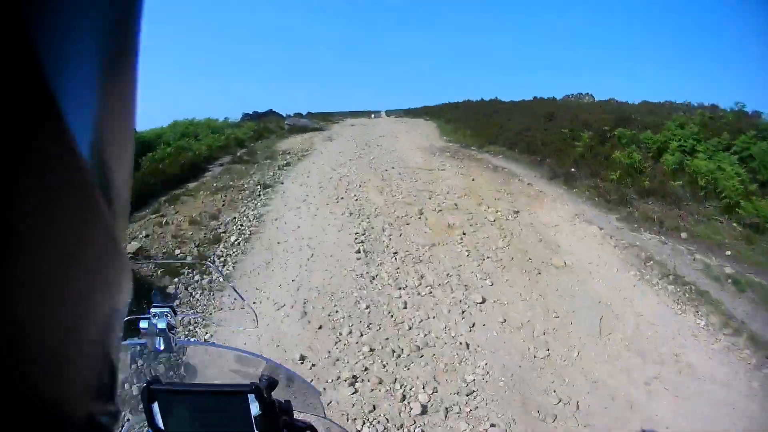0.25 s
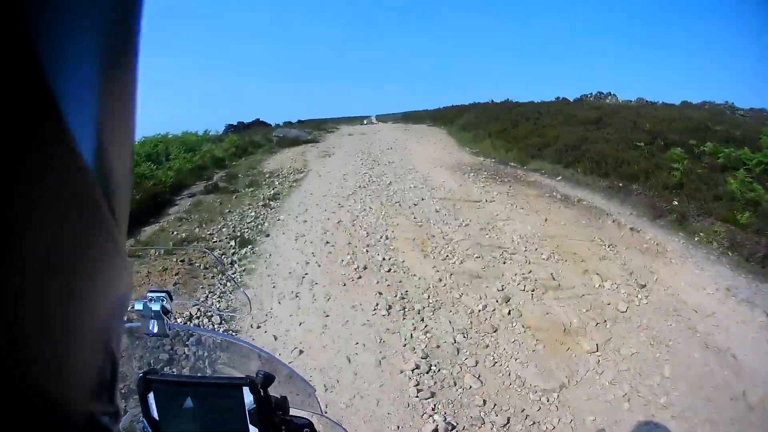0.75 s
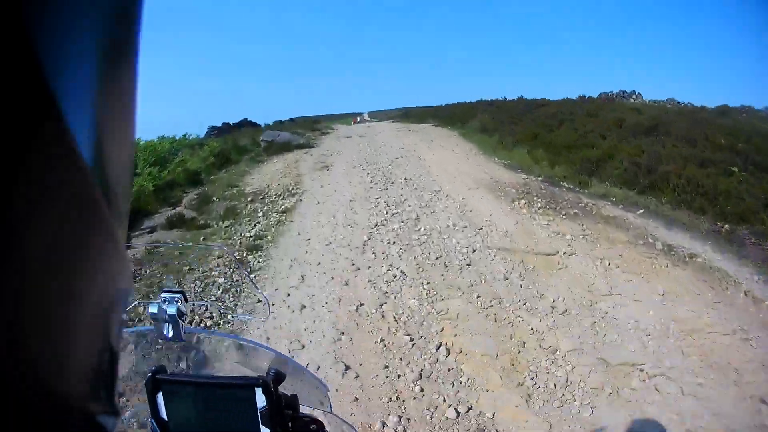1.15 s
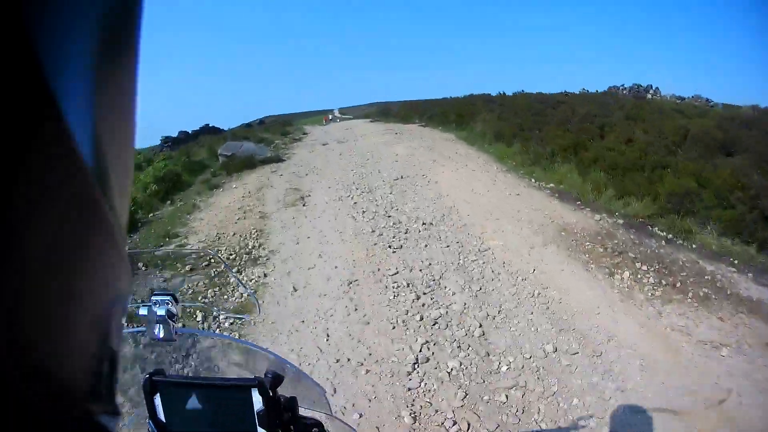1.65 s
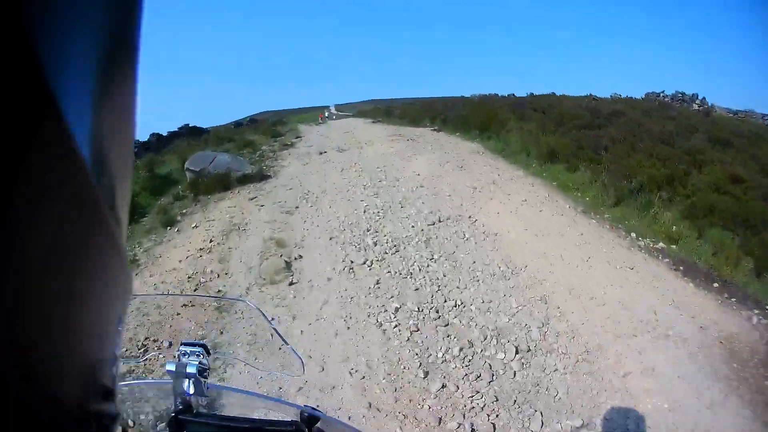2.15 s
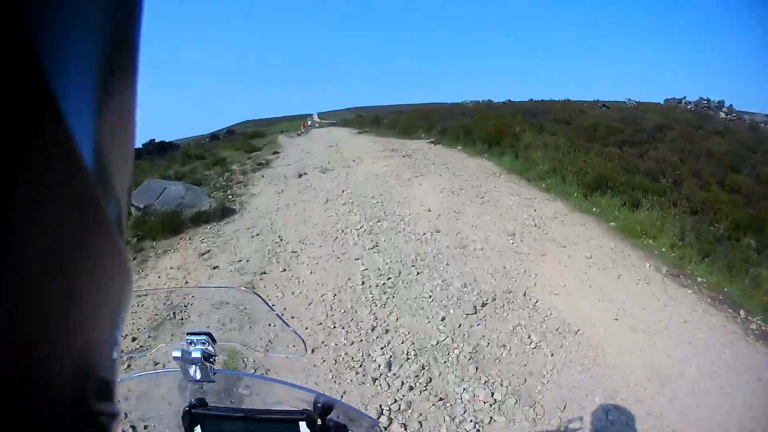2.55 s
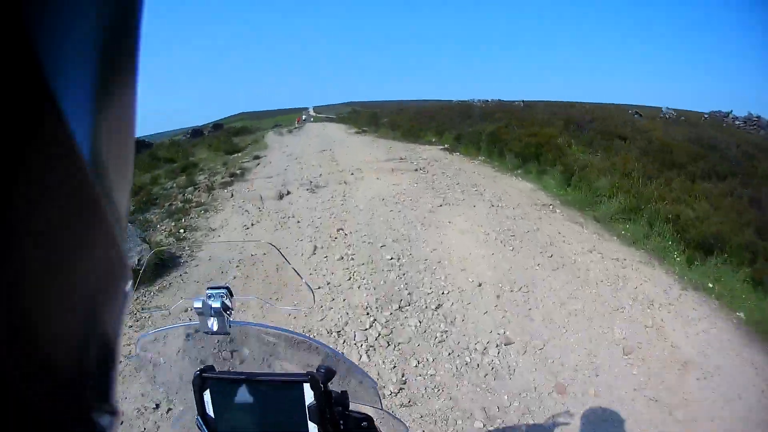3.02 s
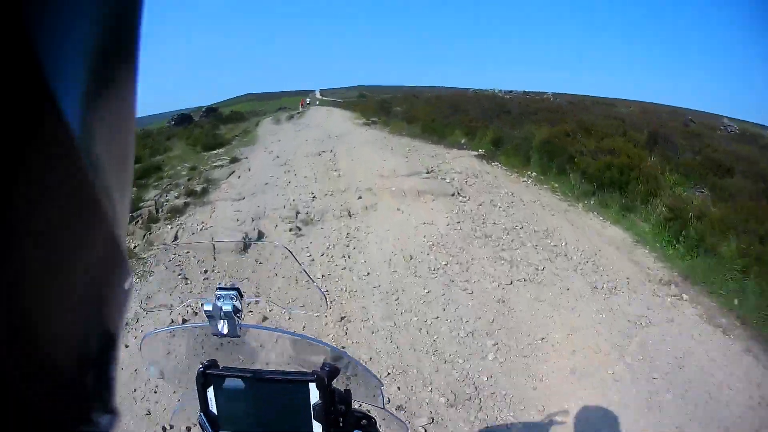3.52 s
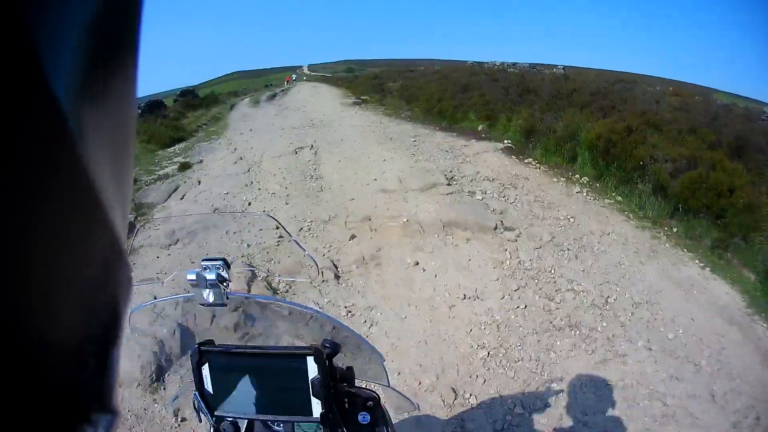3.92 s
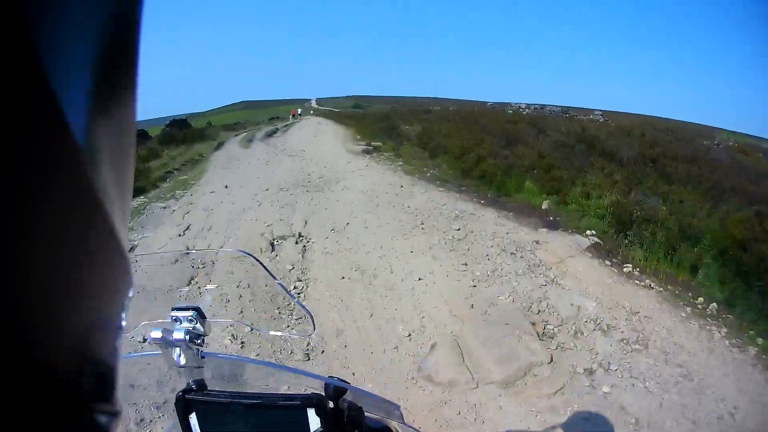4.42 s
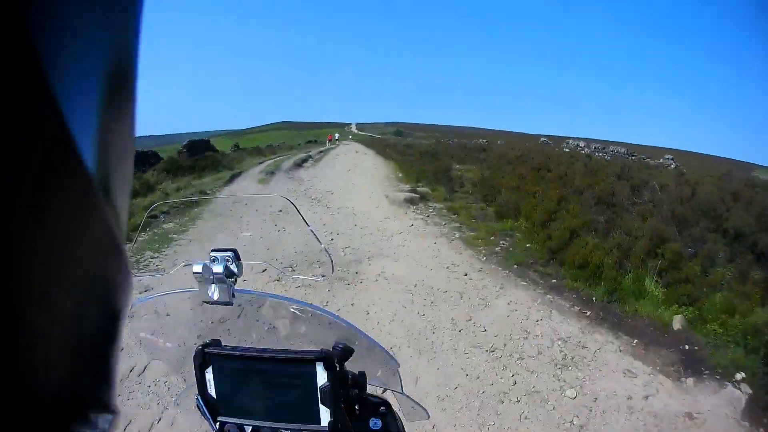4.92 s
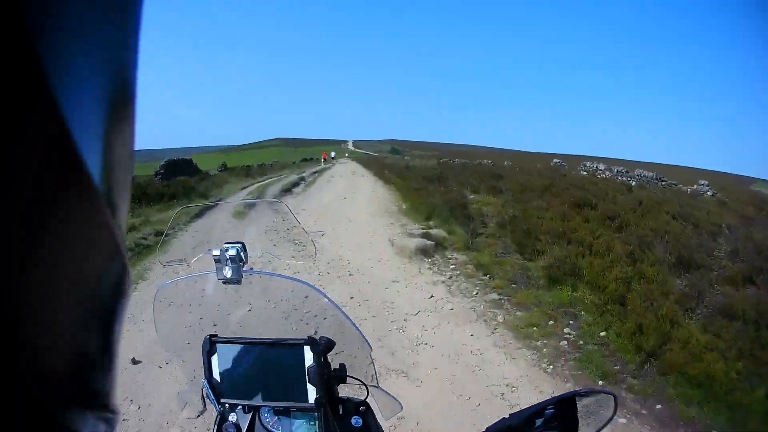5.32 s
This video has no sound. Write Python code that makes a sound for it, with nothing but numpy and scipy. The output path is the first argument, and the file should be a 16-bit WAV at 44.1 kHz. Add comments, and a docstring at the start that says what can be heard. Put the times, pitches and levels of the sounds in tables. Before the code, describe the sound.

Low, lumpy motorcycle engine beats over crunching gravel, with irregular dull thuds, sharp case rattles and ticking pebbles, under a thin treble hiss.

```python
"""A twin-cylinder motorcycle pulls along a stony track, heard by a small camera in a case on the rider's helmet.
Two uneven exhaust beats a cycle excite the decaying modes of the pipe; metal noise flares with each beat.
Gravel crunches as filtered random grains, and ruts knock the bike with thuds and resonant case rattles.
Pebbles tick, a small metal part pings, and the frame shakes over a low rumble.
The case dulls the knocks' upper modes; preamplifier hiss rises towards the treble."""
import sys
import numpy as np
from scipy import signal
from scipy.io import wavfile
from scipy.ndimage import uniform_filter1d

SR = 44100
rng = np.random.default_rng(int(sys.argv[2]) if len(sys.argv) > 2 else 0)


def store_wav(level_fs):
    """Save 16-bit WAV to argv[1]."""
    pcm = np.round(np.clip(np.atleast_2d(level_fs), -1, 1) * 32767)
    wavfile.write(sys.argv[1], SR, pcm.T.astype(np.int16))


def nominal_scale(level):
    """Amplitude ratio for a level in decibels (scalar or array-like)."""
    x = np.asarray(level, float) / 20
    return 10 ** x


N = 245637

# Crank speed. Each row: time in seconds, speed in rpm.
CRANK_SPEED = [(0.0, 2240.0), (0.39, 2168.4), (0.46, 2141.6), (0.51, 2325.9), (0.57, 2061.3),
               (0.96, 2122.8), (1.41, 2069.8), (1.46, 2124.5), (1.91, 1914.4), (1.97, 1998.3),
               (2.19, 1886.0), (3.11, 1989.0), (3.3, 2065.0), (3.64, 1983.3), (3.99, 2003.9),
               (4.05, 1816.6), (4.51, 1966.0), (4.56, 1791.4), (4.64, 1961.9), (5.07, 2050.8),
               (5.22, 1807.8), (5.57, 2045.3)]
# Engine load, heard as exhaust loudness. Each row: time in seconds, level in dB.
ENGINE_LOAD = [(0.0, -30.5), (0.09, -28.5), (1.72, -30), (1.83, -31.5), (2.22, -30.5), (2.25, -32),
               (2.96, -30), (4.56, -31), (4.9, -28.5), (4.96, -29.5), (5.57, -29)]
# Feeble firings. Each row: time in seconds, change of strength in dB.
FEEBLE_FIRINGS = [(0.003, -2.5), (2.25, -10), (4.14, -5), (4.268, -8), (4.332, -5)]
# Modes of the exhaust pipe. Each row: frequency in Hz, 60 dB decay time in seconds,
# signed share from the first cylinder, signed share from the second.
EXHAUST_MODES = [(59, 0.059, -0.25, -0.43), (85.4, 0.034, 0.28, 0.91), (104.7, 0.061, 0.071, -0.17),
                 (224.7, 0.053, 0.23, 0.23), (261.2, 0.18, 0.048, 0.029), (282.6, 0.059, -0.04, -0.17),
                 (327.5, 0.12, 0.034, 0.0023), (480, 0.019, 0.047, 0.03)]
# How loose the track lies. Each row: time in seconds, gravel crunch level in dB.
TRACK_LOOSENESS = [(0.0, -38.5), (0.54, -39.5), (0.73, -42), (1.58, -41), (2.0, -41.5), (2.25, -45.5),
                   (3.15, -41.5), (3.85, -44.5), (4.08, -41.5), (4.56, -40.5), (4.92, -37), (5.24, -42),
                   (5.57, -39.5)]
# Spectrum of the clattering metal. Each row: frequency in Hz, relative density in dB per Hz.
CLATTER_SPECTRUM = [(250, 8), (380, -15.5), (520, -19.5), (700, -30.5), (900, -8), (1150, -31.5),
                    (1700, -11), (2400, -16), (3000, -19.5), (3800, -32), (4400, -47), (8000, -37)]
# Filter that colours the crunching stones. Each row: frequency in Hz, gain in dB.
CRUNCH_SPECTRUM = [(200, -16), (330, -0.5), (550, -4.5), (750, -6.5), (1150, -10.5), (1600, -8.5),
                   (2400, -8), (3100, -15.5), (3800, -17.5), (4400, -29.5), (5600, -27.5), (10000, -44.5)]
# Spectrum of the preamplifier hiss. Each row: frequency in Hz, relative density in dB per Hz.
HISS_SPECTRUM = [(3000, 1), (4600, -2), (7000, -1), (10200, 1.5), (15300, 2.5)]
# Jolts from the ruts. Each row: start in seconds, thud peak in dB (before its boom),
# low clack peak in dB, bright crack peak in dB.
RUT_KNOCKS = [(0.0062, -25.5, -31, -30), (0.0162, -32, -41, -31.5), (0.085, -34, -44, -27),
              (0.1447, -24, -30, -32), (0.1575, -18, -25, -22), (0.163, -20, -38, -34),
              (0.1708, -24, -35, -40), (0.2013, -37, -40, -31), (0.2479, -22.5, -36, -27),
              (0.3493, -24.5, -35, -40), (0.36, -32, -34, -26), (0.3705, -22.5, -31, -26.5),
              (0.3856, -44, -37, -46), (0.4773, -23.5, -27, -38), (0.4901, -22, -29, -27),
              (0.562, -21, -32, -43), (1.242, -25.5, -35, -61), (1.371, -29, -29, -33),
              (1.4822, -21.5, -25, -26), (1.5047, -12, -20.5, -16.5), (1.5137, -17.5, -44, -31),
              (1.7119, -19, -22, -18.5), (1.7231, -23, -35, -29), (1.9156, -19.5, -26, -28),
              (1.9331, -25, -29.5, -23.5), (1.9462, -33, -36, -31), (1.9826, -25.5, -33, -35),
              (2.0083, -24.5, -29, -32), (2.018, -29, -31, -32), (2.029, -25, -29.5, -25.5),
              (2.043, -28, -48, -43), (3.3446, -22.5, -34, -42), (4.0379, -33, -52, -30),
              (4.09, -20, -29, -28), (4.1155, -13, -25, -16.5), (4.1262, -10.5, -26, -21),
              (4.221, -22.5, -40, -48), (4.2635, -21, -33, -34.5), (4.285, -15, -23.5, -20),
              (4.2942, -17.5, -34, -28), (4.308, -25.5, -40, -42), (4.318, -41, -44, -43),
              (4.3391, -21.5, -27, -27), (4.6339, -28, -30, -28), (4.646, -38, -35, -45),
              (4.7188, -23.5, -47, -48), (4.8465, -19, -39, -29), (4.859, -10.5, -21.5, -15.5),
              (4.8663, -11.5, -34, -27.5), (4.879, -26, -39, -52), (4.9237, -33, -33, -29.5),
              (5.4283, -27.5, -26, -29), (5.5066, -14.5, -31, -50), (5.5168, -19, -22.5, -43)]
# Modes that a knock rings, from low to high. Each row: central frequency in Hz,
# width in Hz (a second pass is twice as wide), relative level in dB.
CASE_MODES = [(806, 570, -1.5), (1060, 215, 2.5), (1384, 216, 5.5), (1900, 660, 12), (2260, 330, 11.5),
              (2650, 440, 12), (3220, 510, 4), (3620, 130, -33), (5270, 690, -27), (5550, 380, -31),
              (8150, 6800, -13)]
# Pings of a small metal part. Each row: start in seconds, level in dB before rise and decay.
METAL_PINGS = [(0.1476, -49), (0.5731, -44), (1.034, -45), (1.505, -38), (1.947, -43), (2.5496, -45),
               (2.809, -46), (3.2001, -50), (4.9237, -38)]
# Pebbles thrown against the bike. Each row: start in seconds, level in dB before rise and decay,
# pitch in Hz.
THROWN_PEBBLES = [(0.246, -34, 3840), (0.9487, -43, 3570), (1.1204, -39, 2300), (1.137, -36, 1780),
                  (1.1927, -36.5, 3380), (1.2114, -33, 2650), (1.426, -36, 3500), (1.431, -31, 2350),
                  (1.808, -34.5, 3500), (1.811, -33, 1760), (1.9832, -35, 2700), (2.429, -31.5, 1980),
                  (2.664, -38, 2250), (3.0335, -34, 2100), (3.4481, -44, 2160), (4.3705, -29, 2200),
                  (4.4179, -35.5, 3400), (4.4503, -29, 2210), (4.4952, -36, 2600), (5.2537, -32, 2500),
                  (5.2957, -42, 2040), (5.321, -34, 2250), (5.358, -32, 2000), (5.381, -30.5, 2380)]


def evened(x):
    """Normalisation by mean power: scales to rms 1."""
    return x / np.sqrt(np.mean(x ** 2) + 1e-20)


def curve(rows):
    """Linear interpolation: one value per sample from (seconds, value) rows."""
    rows = np.array(rows)
    return np.interp(np.arange(N) / SR, rows[:, 0], rows[:, 1])


def colour(x, points):
    """Minimum-phase filtering: the log gain of (Hz, dB) points fixes the phase of a causal filter."""
    hz = np.abs(np.fft.fftfreq(8192, 1 / SR))
    f, db = np.transpose(points)
    log_gain = np.log(nominal_scale(np.interp(np.log(hz + 1), np.log(f), db)))
    log_gain += 2 * np.log(np.clip(hz / f[0], 1e-3, 1))  # 12 dB an octave down below the first point
    taps = np.fft.ifft(np.exp(np.conj(signal.hilbert(log_gain)))).real[:4096]
    return signal.oaconvolve(x, taps)[:len(x)]


def resonate(x, hz, width):
    """Simple resonance: one damped complex pole, with a gain of about 1 at its peak."""
    pole = np.exp((2j * np.pi * hz - np.pi * width) / SR)
    return 2 * signal.lfilter([1 - abs(pole)], [1, -pole], x).real


def add(mix, s, sound):
    """Superposition: mixes a sound in at s seconds."""
    part = mix[max(round(s * SR), 0):][:len(sound)]
    part += sound[:len(part)]


def firings(first=.6553, second_lag=.3667, spread_db=.75):
    """Four-stroke timing: each cylinder fires once in two crank turns, with slightly uneven strength."""
    # first and second_lag are fractions of the four-stroke cycle
    cycles = np.cumsum(curve(CRANK_SPEED)) / SR / 120 - first
    trains = np.zeros((2, N))
    chance = rng.standard_normal((2, 200))
    for k in range(2):
        at = np.flatnonzero(np.diff(np.floor(cycles - k * second_lag)))
        db = spread_db * chance[k, :len(at)]
        for s, feeble_db in FEEBLE_FIRINGS:
            db = db + feeble_db * (abs(at / SR - s) < .008)
        trains[k, at] = nominal_scale(db)
    return trains


def exhaust(trains, echo_s=0.01512, echo=0.1):
    """Impulse excitation of pipe modes: a short suction, a sharp puff and its one return from the open end."""
    lead = SR // 50
    t = np.arange(-lead, 2 * lead) / SR
    suction = -.83 * np.exp(-abs(t) / .0019)
    pulse = np.where(t < 0, suction, np.exp(-abs(t) / .001))
    returned = echo * (t >= echo_s) * np.exp(-abs(t - echo_s) / 0.00049)
    u = np.arange(SR // 3) / SR
    echo_ring = nominal_scale(-60 * u / 0.056) * np.sin(2 * np.pi * 285 * u)
    out = np.zeros(N)
    for k, train in enumerate(trains):
        rings = np.zeros(len(u))
        for hz, t60, *shares in EXHAUST_MODES:
            rings += shares[k] * nominal_scale(-60 * u / t60) * np.sin(2 * np.pi * hz * u)
        beat = signal.fftconvolve(pulse, rings) + signal.fftconvolve(returned, echo_ring)
        out += signal.oaconvolve(train, beat)[lead:lead + N]
    return nominal_scale(curve(ENGINE_LOAD)) * evened(out)


def clatter(trains, level_db=-41.5, steady=.13, second=.75, valve=.4):
    """Amplitude modulation of noise: metal flares after each firing and again when a valve seats."""
    t = np.arange(SR // 25) / SR
    flare = (1 - np.exp(-t / 0.0012)) * np.exp(-t / 0.004)
    seating = np.roll(trains.sum(0), round(0.0131 * SR))  # 13.1 ms after the firing
    beats = trains[0] + second * trains[1] + valve * seating
    gate = steady + signal.oaconvolve(beats, flare / flare.max())[:N]
    wobble = nominal_scale(0.97 * evened(uniform_filter1d(rng.standard_normal(N), 150)))
    noise = gate * wobble * rng.standard_normal(N)
    return nominal_scale(level_db) * evened(colour(noise, CLATTER_SPECTRUM))


def tumbling(under_crack_db=-23, t60=0.17):
    """Exponential decay: stones keep tumbling after each knock, starting this far under its crack."""
    jolts = np.zeros(N)
    t = np.arange(SR // 4) / SR
    for s, _, _, crack_db in RUT_KNOCKS:
        add(jolts, s, nominal_scale(crack_db + under_crack_db - 60 * t / t60))
    return jolts


def gravel(per_s=600, size_db=4.0, large_db=2.5, large_boost_db=6, grain_s=0.003, rise_s=0.0004):
    """Random shot noise: stones of uneven size crack under the tyres, large ones low and small ones high."""
    draw = rng.random((3, N))
    size = np.minimum(rng.exponential(1, (3, N)), 4)
    stones = (draw < per_s / SR) * nominal_scale(np.array([[large_db], [size_db], [size_db]]) * size)
    stones = signal.lfilter([1], [1, -np.exp(-1 / (rise_s * SR))], stones)
    envelopes = signal.lfilter([1], [1, -np.exp(-1 / (grain_s * SR))], stones)
    bursts = envelopes * rng.standard_normal((3, N))
    bands = [(1100, "low"), ((1100, 2300), "band"), (2300, "high")]
    large, middle, small = (signal.lfilter(*signal.butter(2, hz, kind, fs=SR), burst)
                            for (hz, kind), burst in zip(bands, bursts))
    crunch = colour(nominal_scale(large_boost_db) * large + middle + small, CRUNCH_SPECTRUM)
    return (nominal_scale(curve(TRACK_LOOSENESS)) + tumbling()) * evened(crunch)


def knocks(rattle_db=-14.0, rattle_t60=0.085, bounce_db=6.0, boom_db=-8, mode_spread_db=2.5,
           thud_base_hz=406, thud_spread=0.085, hollow_from_db=9.5, hollow_hz_per_db=16.5):
    """Modal excitation: a blow and bouncing rattle ring the case, over a dull thud that starts inward."""
    out = np.zeros(N)
    t = np.arange(SR // 8) / SR
    case_wall = signal.butter(4, 4300, fs=SR, output="sos")
    noise = rng.standard_normal((len(RUT_KNOCKS), 2, len(t)))
    spots = rng.standard_normal((len(RUT_KNOCKS), 1 + len(CASE_MODES)))
    for (s, thud_db, clack_db, crack_db), (n, lumps), spot in zip(RUT_KNOCKS, noise, spots):
        # each knock lands elsewhere, so pitch and modes vary
        thud_hz = thud_base_hz * np.exp(thud_spread * spot[0])
        shares = nominal_scale(mode_spread_db * spot[1:])
        # a crack far under the thud makes a higher, hollow knock
        thud_hz += hollow_hz_per_db * max(thud_db - crack_db - hollow_from_db, 0)

        blow = 1.3 * n * np.minimum(t / 0.0004, 1) * np.exp(-t / 0.0011)
        bounces = nominal_scale(bounce_db * evened(uniform_filter1d(lumps, size=50)))
        rattle = n * bounces * np.minimum(t / 0.0027, 1) * nominal_scale(rattle_db - 60 * t / rattle_t60)
        # the modes above 4.5 kHz get only a brief hiss of light parts
        light = n * np.minimum(t / 0.001, 1) * nominal_scale(-17 - 60 * t / 0.045)
        rings = []
        for (hz, width, db), share in zip(CASE_MODES, shares):
            source = rattle + blow if hz < 4500 else light
            mode_hz = hz * share ** .1
            ring = resonate(resonate(source, mode_hz, width), mode_hz, 2 * width)
            rings.append(share * nominal_scale(db) * ring)
        clack = sum(rings[:3])
        crack = signal.sosfilt(case_wall, sum(rings[3:8])) + sum(rings[8:])

        # the thud swells within a turn and dies in a few
        thud = -np.sin(2 * np.pi * thud_hz * t) * np.minimum(t * thud_hz * 1.3, 1)
        thud *= nominal_scale(-60 * t * thud_hz / 3.6)
        boom = evened(resonate(resonate(n, 180, 260), 190, 320))
        boom *= np.minimum(t / 0.005, 1) * nominal_scale(boom_db - 60 * t / rattle_t60)
        add(out, s, nominal_scale(crack_db) * crack / abs(crack).max())
        add(out, s, nominal_scale(clack_db) * clack / abs(clack).max())
        add(out, s, nominal_scale(thud_db) * (thud / abs(thud).max() + boom))
    return out


def pebbles(t60=0.022, rise_s=.0008, grit=0.6):
    """Damped impact tone with narrow-band noise: each pebble ticks grittily at its own pitch."""
    out = np.zeros(N)
    t = np.arange(SR // 20) / SR
    noise = rng.standard_normal((len(THROWN_PEBBLES), len(t)))
    for (s, db, hz), n in zip(THROWN_PEBBLES, noise):
        rough = evened(resonate(resonate(n, hz, 900), hz, 840))
        tick = np.sin(2 * np.pi * hz * t) + grit * rough
        add(out, s, nominal_scale(db - 60 * t / t60) * np.minimum(t / rise_s, 1) * tick)
    return out


def pings(hz=5580, t60=0.024, rise_s=0.0023):
    """Free vibration with damping: a small metal part gives a brief high ring."""
    out = np.zeros(N)
    t = np.arange(SR // 20) / SR
    for s, db in METAL_PINGS:
        add(out, s, nominal_scale(db - 60 * t / t60) * np.minimum(t / rise_s, 1) * np.sin(2 * np.pi * hz * t))
    return out


def shake(shake_db=-50, lag_turns=0.35, rumble_db=-52, bump_s=2.19, bump_db=-32):
    """Forced vibration: the frame shakes once a crank turn, over lumpy track rumble and one soft bump."""
    turns = np.cumsum(curve(CRANK_SPEED)) / SR / 60
    frame = nominal_scale(shake_db) * np.sqrt(2) * np.sin(2 * np.pi * (turns - lag_turns))
    rumble = evened(resonate(resonate(rng.standard_normal(N), 36, 30), 39, 40))
    since = np.arange(N) / SR - bump_s
    bump = nominal_scale(bump_db) * np.exp(-(since / 0.062) ** 2) * np.sin(2 * np.pi * 40 * since)
    return frame + nominal_scale(rumble_db) * rumble + bump


def scene():
    """Linear superposition of engine, tyres, jolts and shaking; one set of firings drives the engine sounds."""
    trains = firings()
    engine = exhaust(trains) + clatter(trains)
    track = gravel() + knocks() + pebbles()
    return (engine + track + pings() + shake())[None]


def low_pass(x):
    """Removes everything above the highest recorded frequency."""
    return signal.sosfilt(signal.butter(12, 16290, fs=SR, output="sos"), x)


def record(dry, hiss_db=-52, offset=-.0457):
    """Additive noise and band limiting: preamplifier hiss, a low-pass edge and a steady offset."""
    hiss = nominal_scale(hiss_db) * evened(colour(rng.standard_normal(N), HISS_SPECTRUM))
    edge = signal.firwin(2047, 15330, window=("kaiser", 9), fs=SR)[None]
    mix = signal.oaconvolve(dry + hiss, edge, "same") + offset
    return low_pass(mix)


dry = scene()
out = record(dry)
store_wav(out)
```